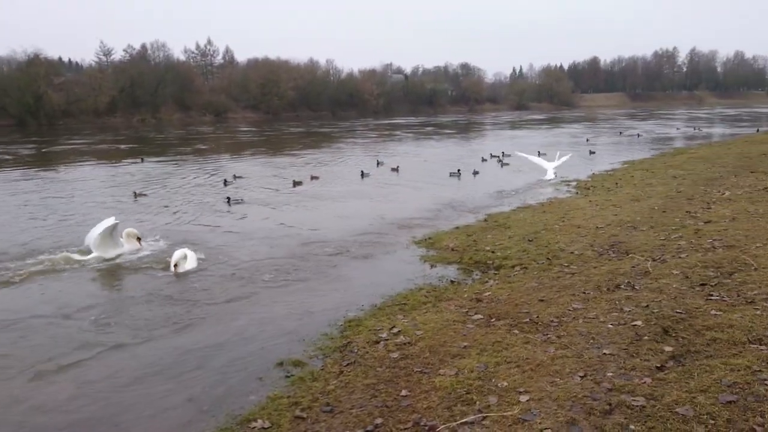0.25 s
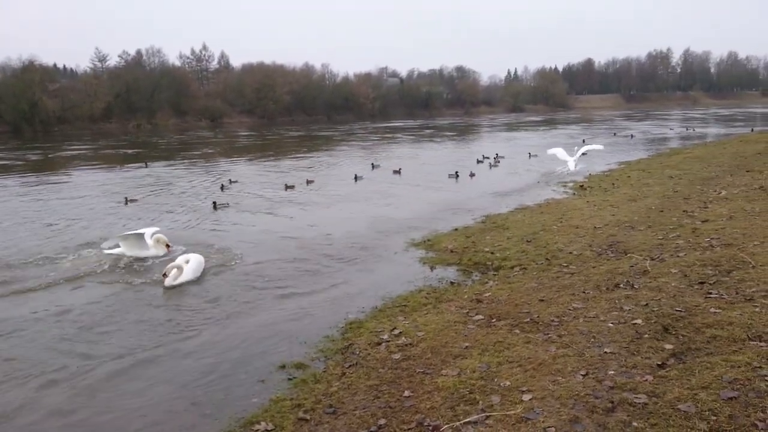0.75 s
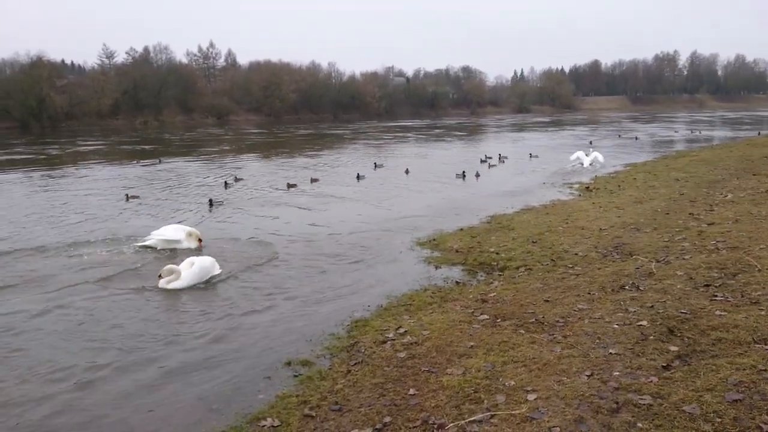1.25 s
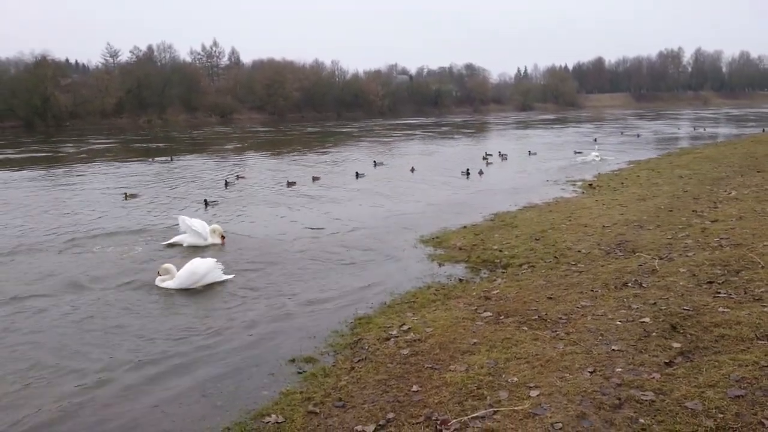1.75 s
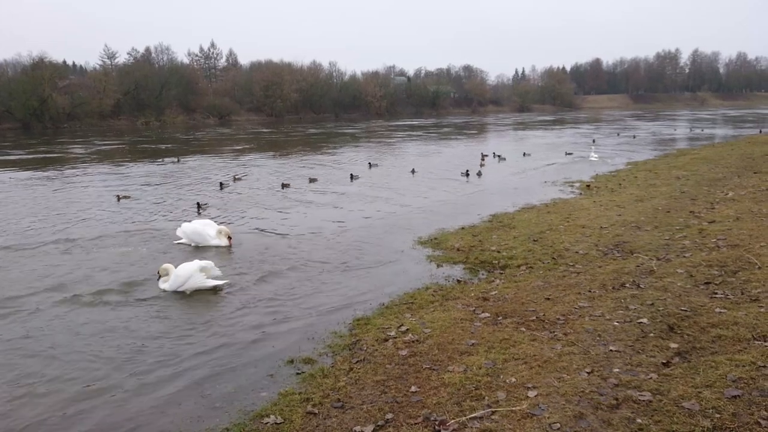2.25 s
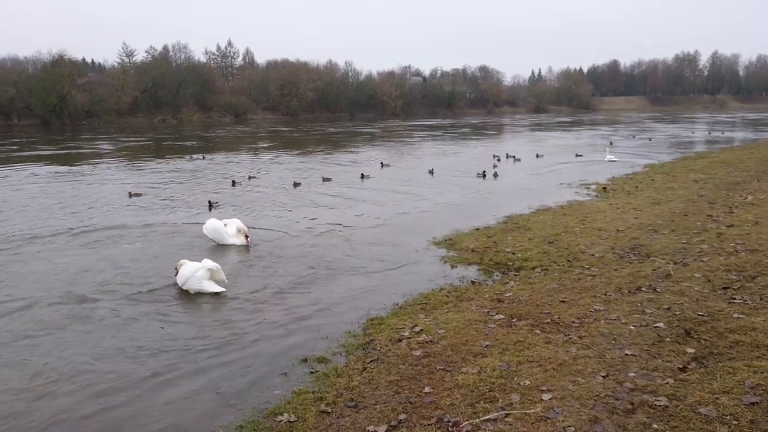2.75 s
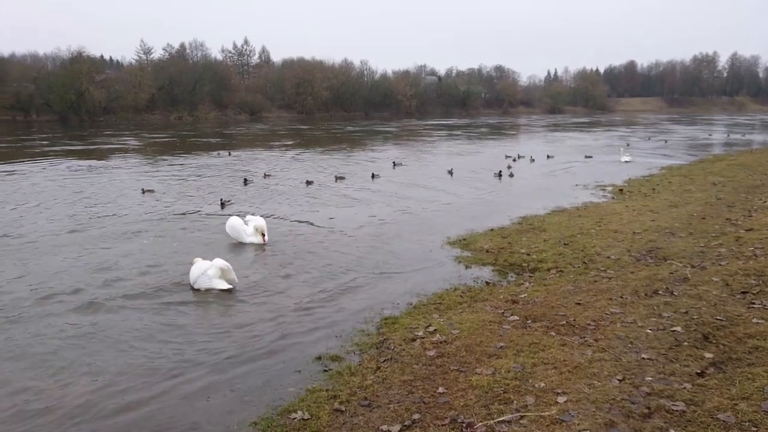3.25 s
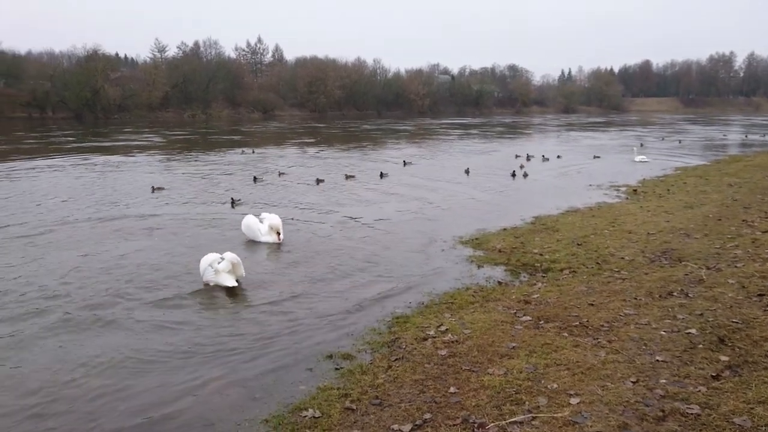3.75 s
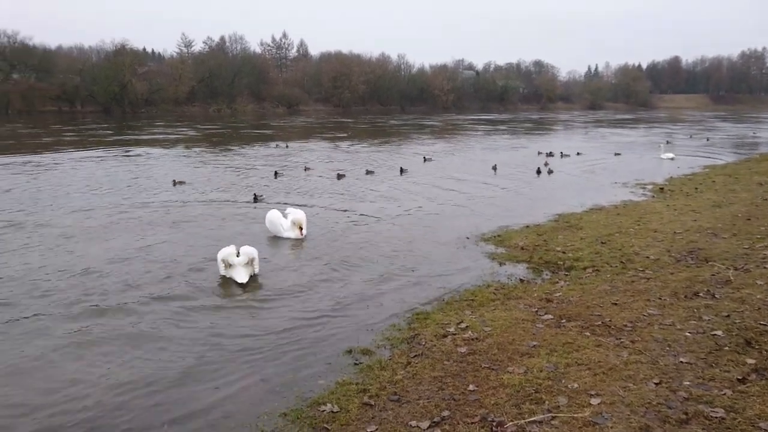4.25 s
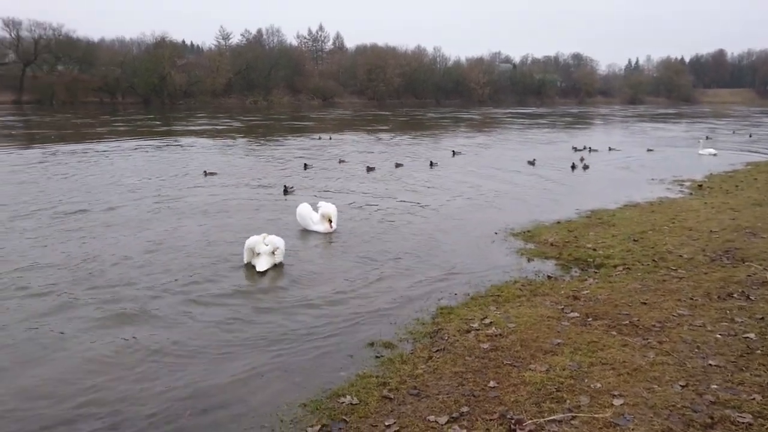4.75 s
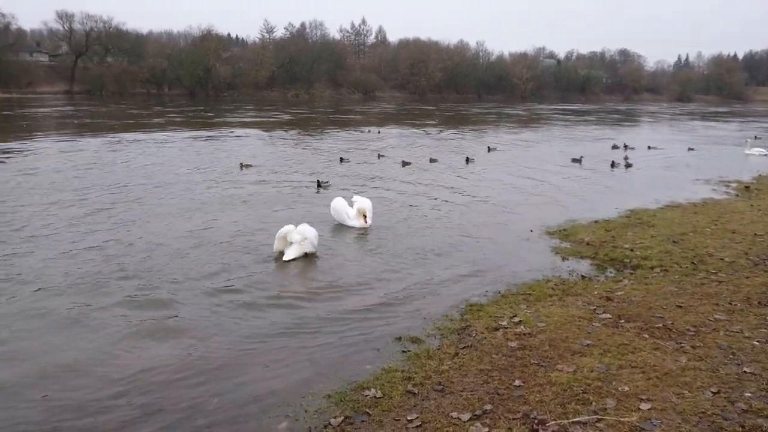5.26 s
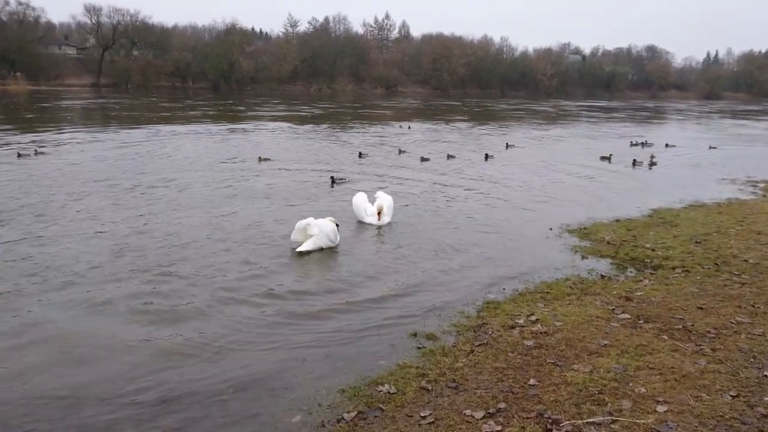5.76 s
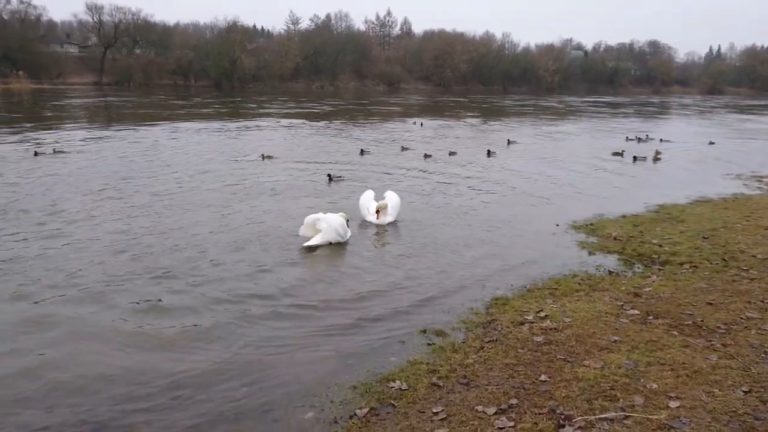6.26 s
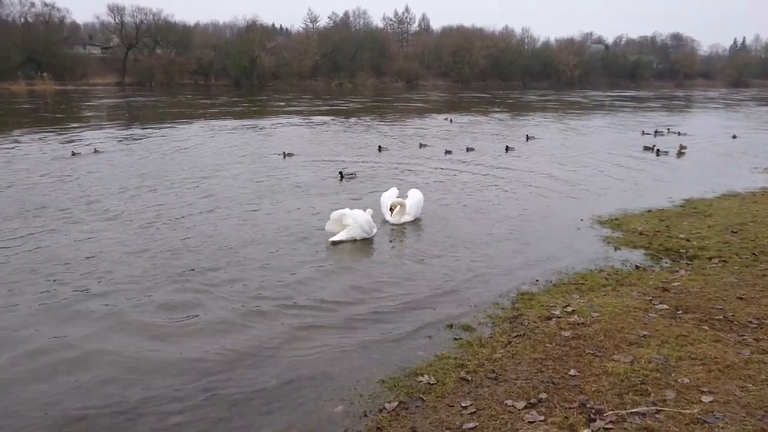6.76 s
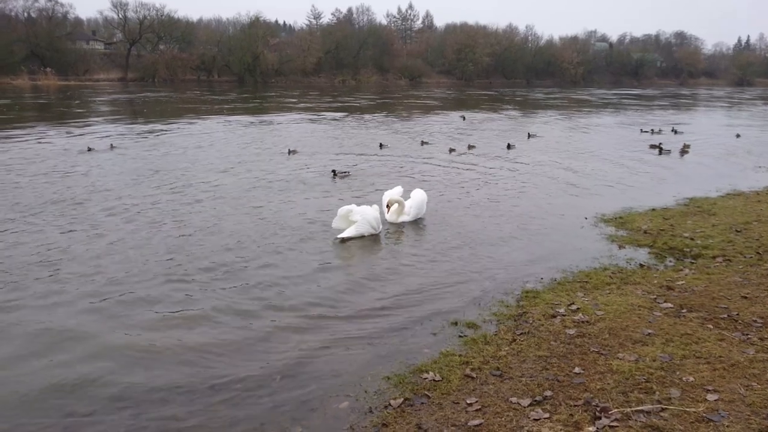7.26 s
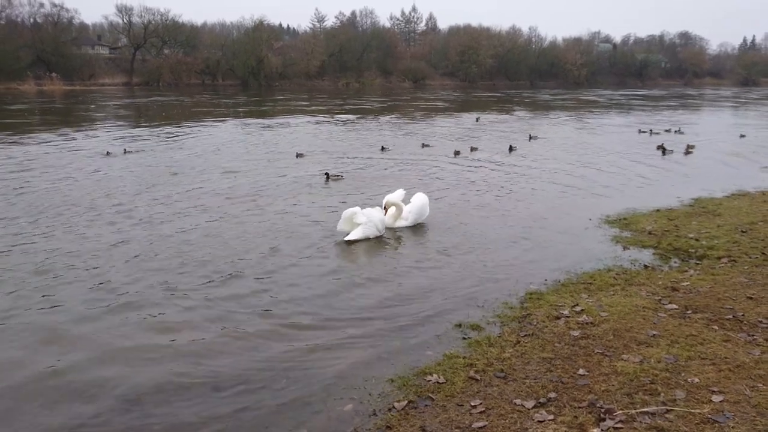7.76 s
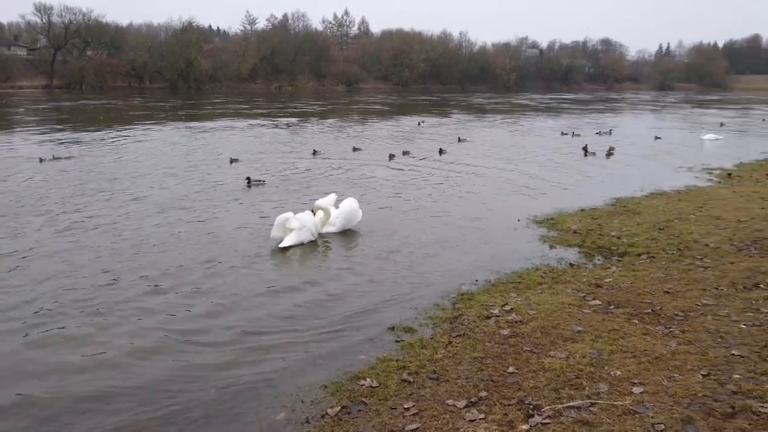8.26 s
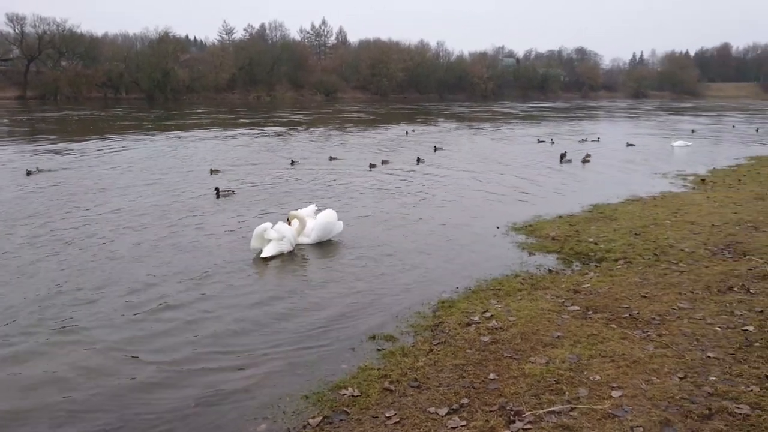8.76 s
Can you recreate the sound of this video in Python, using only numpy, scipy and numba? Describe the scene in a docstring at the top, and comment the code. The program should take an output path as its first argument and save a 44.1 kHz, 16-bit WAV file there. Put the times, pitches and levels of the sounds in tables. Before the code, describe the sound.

A river bank outdoors, with soft current wash and low uneven rumble throughout. At 0 s a landing swan throws up loud fizzing spray, with a cluster of deep hollow slaps until 0.5 s; a smaller splash follows near 1 s, and a few plunks at 1.5 and 2 s, thinning to a trickle. Hoarse, nasal, fluttering swan snorts sound at 0-0.3, 0.6-1.0, 1.4-1.8 and, brighter, 2.1-2.5 s. From 3.2 s small distant ducks quack faintly in short rough notes, more often from 5.7 to 8 s. Strong short snorts come at 4.5-4.85 and 5.4-5.65 s, dropping in pitch at the end. Tiny water ticks appear now and then. A faint far engine hums from about 5.7 s, its pitch climbing. Loud raspy snorts return at 8.25-8.6 s and from 8.95 s to the cut. Swans lean right; thin microphone hiss, little echo.

```python
"""Hoarse swan snorts over a river, with wing slaps and spray from a landing that dies down to a trickle.
Each snort is pulses and air, chopped by a slow flutter, ringing windpipe, throat and beak.
Slaps are ringing air pockets and noise ticks; the spray is coloured drop noise over a gurgle of bubbles.
Behind them ducks quack from pulses through two resonances, a far engine hums as a stack of sines,
and filtered noise gives the low rumble and the wash of the current."""
import sys
import numpy as np
from scipy import signal
from scipy.fft import rfft, irfft, next_fast_len
from scipy.io import wavfile
from scipy.ndimage import uniform_filter1d
from numba import njit

SR = 44100
rng = np.random.default_rng(int(sys.argv[2]) if len(sys.argv) > 2 else 0)


def digitize_waveform(pressure):
    """Quantize a signal to 16-bit integers and store it at the path in sys.argv[1].

    Rows of a 2-D input are taken as channels; values are limited to [-1, 1].
    """
    field = np.atleast_2d(pressure).T
    bounded = np.clip(field, -1, 1)
    quanta = np.round(bounded * 32767).astype(np.int16)
    wavfile.write(sys.argv[1], SR, quanta)


N = 397341
TIME = np.arange(N) / SR

# Wash of the current. Each row: frequency in Hz, relative level in dB.
RIVER_COLOUR = [(150, -5), (220, -8), (360, -17.5), (650, -16.5), (1000, -19.5), (1600, -22.5),
                (2200, -26.5), (3000, -36.5), (4000, -38.5), (5100, -34), (6500, -44), (8500, -45.5),
                (12000, -56.5)]
RIVER_DB = -53.5  # wash level before the stereo spread
# Stereo balance of the river. Each row: frequency in Hz, left minus right in dB.
RIVER_PAN = [(60, -5), (150, -1), (330, -9.5), (700, -5), (1300, 2), (2400, -10), (3900, -15.5),
             (5000, 8.5), (6500, -3), (8000, -5), (10500, 5)]
# Low rumble. Each row: frequency in Hz, relative level in dB.
RUMBLE_COLOUR = [(30, -20), (45, -2), (65, -0.5), (95, -2.5), (140, -8.5), (200, -22.5), (500, -49.5),
                 (1500, -85)]
# Brief swells of the rumble. Each row: middle in seconds, half length in seconds, level in dB before the trim.
RUMBLE_SWELLS = [(0.102, 0.18, -47.5), (0.695, 0.039, -41), (1.825, 0.067, -42.5), (3.068, 0.2, -46),
                 (4.925, 0.023, -41), (5.153, 0.061, -45), (7.03, 0.025, -43.5)]
RUMBLE_DB, RUMBLE_WANDER_DB, RUMBLE_TRIM_DB = -49.5, 1.5, -1  # the floor is set before the trim

# Course of the far engine. Each row: time in seconds, firing rate in Hz, level in dB before its colour.
ENGINE_COURSE = [(5.5, 60.36, -68), (5.9, 61.05, -53.5), (6.2, 63.36, -50), (6.5, 63.64, -55),
                 (7, 72.5, -59), (7.4, 76.7, -73), (8.15, 83.9, -60.5), (8.4, 96.3, -57.5),
                 (8.7, 102.6, -58.5), (9.01, 105.7, -56.5)]
# Tone of the engine. Each row: frequency in Hz, gain in dB.
ENGINE_COLOUR = [(60, 9.5), (105, 8), (130, -24), (200, -2.5), (400, -30), (490, -8.5), (630, -3.5),
                 (760, -26)]

# Duck quacks. Each row: middle in seconds, nominal length in seconds, level in dB before the side gains,
# throat resonance in Hz before the lift of the bill, bill resonance over the throat in dB.
QUACKS = [(3.166, 0.06, -63.5, 1700, -1), (3.317, 0.081, -64.5, 1880, -1), (3.524, 0.041, -69, 1870, 5),
          (3.679, 0.1, -67.5, 1880, 0), (3.87, 0.031, -69.5, 1460, -3), (4.201, 0.05, -67, 1900, 4),
          (4.408, 0.06, -64.5, 1900, -2), (4.95, 0.063, -62, 1830, -2), (5.752, 0.063, -62, 1890, -1),
          (5.923, 0.065, -58.5, 1900, 0), (6.052, 0.019, -69, 1400, -8), (6.19, 0.054, -64, 1920, -16),
          (6.226, 0.066, -62, 1800, 4), (6.351, 0.067, -69.5, 1950, 1), (6.621, 0.072, -63, 1990, 0),
          (6.766, 0.042, -66, 1750, -14), (6.839, 0.06, -59, 1800, -1), (6.981, 0.06, -63, 1970, -4),
          (7.168, 0.073, -61, 1840, 1), (7.338, 0.071, -60.5, 1800, -1.5), (7.64, 0.061, -64, 2040, 2),
          (7.853, 0.088, -62.5, 1903, 1), (8.096, 0.046, -65.5, 1930, -12), (8.707, 0.085, -64.5, 1881, 3),
          (8.79, 0.054, -65, 1850, 0)]
DUCK_THROAT_WIDTH_HZ, BILL_HZ, BILL_WIDTH_HZ = 420, 2646, 295  # the bill's centre is before its lift

# Sheets of water thrown up by the landing swan. Each row: start in seconds, spray in dB before the trim,
# sloshing in dB; both levels are before the rise and fall.
SPLASHES = [(-0.05, -39.5, -54), (0.44, -73, -73), (0.98, -48.5, -53), (1.62, -59, -74)]
SPLASH_RISE_S, SPLASH_FALL_DB_PER_S = 0.13, 23
# The wake under the splashes: starting spray level before the trim, starting slosh level, and fade.
TRICKLE_DB, TRICKLE_SLOSH_DB, TRICKLE_FALL_DB_PER_S = -46, -52, 8
SPRAY_TRIM_DB = 5
# Fizz of the drops. Each row: frequency in Hz, relative level in dB.
SPRAY_COLOUR = [(590, -14.5), (1000, -13.5), (1100, -27), (1390, -4.5), (1600, -12), (1860, -5),
                (2110, -8.5), (2590, -8), (4150, -16), (5040, -9.5), (7790, -26), (11900, -26.5),
                (13500, -24), (15500, -31.5)]
# Stereo balance of the fizz. Each row: frequency in Hz, left minus right in dB.
SPRAY_PAN = [(1200, 1), (2500, -10.5), (3300, -6.5), (4000, -6), (4900, 16.5), (6500, 0), (8500, 0),
             (11000, -2.5), (15000, 32)]

# Air pockets from wings and feet. Each row: start in seconds, nominal peak in dB before the side gains,
# starting pitch in Hz.
PLUNGES = [(0.032, -29.5, 220), (0.079, -32.5, 156), (0.11, -35, 118), (0.138, -34, 202), (0.199, -33, 141),
           (0.251, -29, 180.5), (0.269, -33.5, 288), (0.29, -28.5, 202), (0.455, -40, 204),
           (0.678, -57, 150), (1.101, -39.5, 266), (1.139, -37.5, 230), (1.166, -44, 295),
           (1.549, -42, 226), (1.986, -38, 327)]
# Small sharp splashes. Each row: start in seconds, level in dB before the trim, left minus right in dB.
SPLISHES = [(0.0518, -43, 8), (0.209, -40, 2), (0.482, -34, 1), (1.919, -44, 0), (1.986, -46, -14),
            (2.7232, -64, 1), (4.018, -56, -13), (4.3236, -58, -12), (6.296, -48.5, 6),
            (8.8636, -46.5, 2.5)]
# Tone of the small splashes. Each row: frequency in Hz, relative level in dB.
SPLISH_COLOUR = [(800, 15), (2400, -42), (3600, 25), (5000, 24), (7000, 11), (14000, -28)]

# Swan snorts. Each row: flutter at the start in Hz, flutter at the end in Hz, rasp resonance in Hz,
# its level over the rest of the rasp in dB, and a course. Each course row: time in seconds, pitch in Hz,
# hoarseness from 0 to 1, flutter depth (limited to 1), throat resonance in Hz, throat level in dB,
# neck modes over the throat in dB, beak opening as tilt of the top neck mode over the lowest in dB,
# rasp over the throat in dB.
SNORTS = [ (80, 100, 5500, -9, [(-.05, 297.4, .5, .4, 1590, -43.5, 3, -4, 1),
          (.1, 286, .6, 0.4, 1600, -48, 2, -7, -10), (.28, 282, .5, .4, 1550, -49.5, 4, -7, -2),
          (.312, 250, .6, .4, 1500, -50, 3, -4, -8)]),
          (98.4, 75, 5000, -3, [(.616, 270, 0.83, .9, 1550, -49, -7, -10, -20),
          (.72, 280.8, 0.75, 0.4, 1600, -48, -0.5, -9, -22), (.82, 300.5, 0.67, .4, 1630, -45, 0, -13, -20),
          (.91, 289.5, 0.64, .3, 1640, -48, 3.5, -19, -25),
          (1.01, 267.4, 0.6, 0.4, 1620, -51.5, 4, -27, -20),
          (1.044, 250.7, .7, .4, 1550, -52, 0, -14, -20)]),
          (99.5, 64, 5070, 6, [(1.39, 291, 0.89, 1, 1580, -52, -0.5, -9, -14),
          (1.48, 292.2, .65, 0.65, 1560, -47, 1, -6, -22), (1.57, 289.4, .65, .6, 1570, -46, 0, -7, -11),
          (1.65, 288.7, .6, 0.56, 1600, -45.5, -1.5, -5, -12),
          (1.74, 284, .55, 0.3, 1540, -44.5, -0.5, -7, -10), (1.79, 251, 0.66, .4, 1500, -51, 2, -6, -17)]),
          (81.9, 74, 5300, -2, [(2.1, 300.4, 0.73, 1.2, 1650, -50, -7, -5, -9),
          (2.145, 312.5, 0.53, 0.8, 1600, -45, -3.5, 4, -17),
          (2.23, 323.5, 0.47, 0.36, 1600, -42, -3.5, 1, -13),
          (2.3, 341.3, 0.39, 0.54, 1700, -40.5, -1, -1, -17),
          (2.37, 329.2, 0.53, 0.5, 1650, -43.5, 0.5, -3, -14.5),
          (2.43, 318, 0.44, 0.3, 1590, -39, -4, 0, -12),
          (2.472, 300, 0.41, .3, 1520, -42.5, -5.5, -6, -4.5),
          (2.503, 247.4, .55, .3, 1400, -48, -6, -7, -7)]),
          (85.4, 35, 5400, -12.5, [(4.48, 301.3, .6, 1, 1200, -50, -8, -6, -9.5),
          (4.54, 310.2, 0.54, 0.3, 1280, -42, -2, 2, -1.5), (4.6, 339, .45, .5, 1610, -39, -1.5, 11, -7.5),
          (4.66, 340, 0.37, 0.4, 1700, -36, -5.5, 5, -15), (4.7, 322, 0.25, 0.4, 1610, -35.5, -5, 3, -16),
          (4.75, 300, 0.2, 0.05, 1528, -43.5, 1.5, 4, -11.5),
          (4.78, 294.7, .4, 0.3, 1500, -41.5, -2, -2, -12), (4.815, 284, 0.04, 0, 1540, -45.5, 3, -2, -10),
          (4.853, 225.5, 0.27, 0, 1750, -43.5, -6, -12, -13)]),
          (59.4, 35, 7060, -3, [(5.392, 298.7, 0.62, 0.7, 1560, -54, 0, -16, -18),
          (5.43, 311.3, 0.4, 0.2, 1600, -48, -3, -20, -25),
          (5.468, 365, 0.3, .3, 1790, -41, -9.5, -21, -29),
          (5.495, 340, .3, 0.67, 1640, -38.5, -15, -29, -27),
          (5.55, 308.6, .42, 0.4, 1580, -45.5, -6, -22, -21),
          (5.6, 283, 0.2, .1, 1670, -47.5, -7.5, -20, -24),
          (5.635, 273.6, 0.07, 0, 1710, -42, -13, -16, -23), (5.665, 217, .25, 0, 1620, -49, -6, -7, -18)]),
          (80.6, 60, 6700, -23, [(8.234, 300.2, 0.75, 1, 1570, -50.5, -7, -2, -6),
          (8.275, 316, .6, 0.77, 1600, -40, -4, -1, -5.5),
          (8.304, 329.4, 0.35, 0.2, 1650, -35.5, -3.5, 4, -8),
          (8.335, 321.5, .52, 0.2, 1640, -38.5, -5, 3, -13),
          (8.37, 313.7, 0.44, 0.2, 1610, -36, -5, -1, -10),
          (8.4, 298.7, 0.04, 0.01, 1530, -38, -5.5, 5, -6.5),
          (8.435, 307.6, 0.53, 0.3, 1600, -38, -4, 7, -9.5),
          (8.52, 298.3, .5, 0.1, 1570, -40.5, -2, 9, -10),
          (8.56, 300, 0.59, 0.38, 1600, -41, -4.5, 0, -9.5),
          (8.588, 254.7, 0.62, .3, 1630, -41, -9, -4, -10)]),
          (68.4, 65, 5300, -24, [(8.938, 294.2, 0.63, 1, 1500, -55, -3, -6, -16),
          (8.97, 305, 0.63, 0.97, 1550, -41.5, -2, -7, -14),
          (9.005, 329.6, 0.47, .4, 1650, -35.5, 0, -2, -15), (9.2, 300, .4, .3, 1600, -40, -4, -3, -12)]), ]
# Upper modes of the long neck. Each row: middle frequency in Hz, width in Hz, level in dB before the beak's tilt.
NECK_MODES = [(2056, 285, 1), (2538, 330, 2), (3020, 275, -0.5)]
NECK_SAG_SHARE, NECK_WAVER_SHARE = 0.027, 0.024  # the modes sink during a snort and waver as the neck moves
# Colour of the rasp on top. Each row: frequency in Hz, relative level in dB.
RASP_COLOUR = [(1500, -26), (2900, -19.5), (3200, -0.5), (3480, 5), (3850, -8.5), (4400, -6), (5000, -14),
               (6500, -20), (9000, -22.5), (11000, -39.5), (15000, -34)]
RELEASE_S, WAVER_SHARE = 0.017, 0.007  # the final fade; unsteadiness of the pitch
FLUTTER_DECAY = 2.9  # how steeply a puff dies within one flap at full flutter depth
THROAT_WIDTH_HZ, LOW_EDGE_HZ = 205, 1190  # the main resonance; the beak radiates little below this edge
BODY_HZ, BODY_WIDTH_HZ = 1450, 1230  # a broad resonance that the throat pulls along
# Stereo balance of the swans. Each row: frequency in Hz, left minus right in dB.
SWAN_PAN = [(800, -3), (1250, -10), (1700, -16), (2500, -23), (3200, -18), (4000, -25), (5000, -3),
            (6500, -5), (9000, -11)]

# Microphone hiss. Each row: frequency in Hz, relative level in dB.
HISS_COLOUR = [(5000, -67), (9000, -7.5), (10600, 12.5), (11700, -23), (13100, 20), (14200, -14),
               (15500, -1)]
TOP_HZ = 15800  # upper cutoff of the microphone


def undb(db):
    """Decibels to amplitude."""
    return 10 ** (np.asarray(db) / 20)


def unit(x):
    """Scale to rms 1."""
    return x / np.sqrt(np.mean(x ** 2) + 1e-18)


def steady(x):
    """Scale to rms 1 over every 25 ms."""
    return x / np.sqrt(np.abs(uniform_filter1d(x ** 2, size=1100)) + 1e-12)


def columns(table, t):
    """The columns of a curve at the times t."""
    s, *values = np.transpose(table)
    return [np.interp(t, s, v) for v in values]


def at_hz(points, hz):
    """A spectrum read on a log-frequency axis."""
    f, db = np.transpose(points)
    return np.interp(np.log(np.maximum(hz, 1)), np.log(f), db)


def colour(x, points, size=4096):
    """Causal filter with the given spectrum, built from its cepstrum."""
    cepstrum = irfft(np.log(undb(at_hz(points, np.fft.rfftfreq(size, 1 / SR)))))
    # fold the cepstrum forward in time for minimum phase
    cepstrum[1:size // 2] *= 2
    cepstrum[size // 2 + 1:] = 0
    impulse = irfft(np.exp(rfft(cepstrum)))
    return signal.oaconvolve(x, impulse)[:len(x)]


def ports(left, right, pan):
    """Two microphone ports, each with its own colour; their mean gain is 1."""
    share = [(hz, 2 / (1 + undb(-db))) for hz, db in pan]
    left_colour = [(hz, 20 * np.log10(gain)) for hz, gain in share]
    right_colour = [(hz, 20 * np.log10(2 - gain)) for hz, gain in share]
    return np.array([colour(left, left_colour), colour(right, right_colour)])


@njit
def svf(x, hz, width):
    """State-variable band-pass with a moving centre."""
    y, band, low = np.empty(len(x)), 0., 0.
    for i in range(len(x)):
        g, k = np.tan(np.pi * hz[i] / SR), width / hz[i]
        v = (band + g * (x[i] - low)) / (1 + g * (g + k))
        band, low, y[i] = 2 * v - band, low + 2 * g * v, k * v
    return y


def ring(x, hz, width):
    """A resonance with steep skirts: two equal band-passes in a row."""
    centre = hz * np.ones(len(x))
    return svf(svf(x, centre, float(width)), centre, float(width))


def noise(count):
    """White noise with rms near 1."""
    return rng.standard_normal(count)


def walk(rate, count):
    """Smooth random motion with a spread near 1, given a new target rate times a second."""
    k = max(int(SR / rate), 1)
    steps = np.repeat(noise(count // k + 1), k)
    return 1.2 * uniform_filter1d(steps, k)[:count]


def pulses(hz):
    """A click at each turn of the phase, shared between two samples; also the phase."""
    phase = np.cumsum(hz / SR) % 1
    turn = np.flatnonzero(np.diff(phase) < 0) + 1
    late = phase[turn] * SR / hz[turn]
    out = np.zeros(len(hz))
    out[turn - 1], out[turn] = late, 1 - late
    return out, phase


def add(out, s, x):
    """Mix x in from time s, trimming what lies outside the scene."""
    start = int(s * SR)
    part = x[..., max(-start, 0):max(N - start, 0)]
    start = max(start, 0)
    out[..., start:start + part.shape[-1]] += part


def smear(x, scatter_s):
    """Rippled water scatters a distant sound over a few milliseconds."""
    t = TIME[:SR // 40]
    tail = unit(noise(len(t)) * np.exp(-t / scatter_s))
    return signal.fftconvolve(x, tail)[:len(x)] / np.sqrt(len(t))


def bubble(hz, cycles, glide):
    """A trapped air pocket rings and rises in pitch as it fades."""
    age = np.arange(int(SR * cycles / hz) + 2) * hz / (SR * cycles)  # 0 to 1 over its life
    tone = np.sin(2 * np.pi * cycles * age * (1 + glide * age / 2))
    return tone * 0.0011 ** age * (1 - np.exp(-2 * cycles * age))


def river(flicker_db=1.04, side_db=-1):
    """Noise for rumble and current; the stereo image is narrowest near 150 Hz and widest in the treble."""
    swells = sum(undb(db) ** 2 * np.exp(-((TIME - s) / half_s) ** 2) for s, half_s, db in RUMBLE_SWELLS)
    floor = undb(RUMBLE_DB + RUMBLE_WANDER_DB * walk(3.1, N))
    strength = np.sqrt(floor ** 2 + swells) * undb(RUMBLE_TRIM_DB)
    crossover = signal.butter(4, 170, "high", fs=SR, output="sos")
    pair = []
    for _ in range(2):
        wash = unit(signal.sosfilt(crossover, colour(noise(N), RIVER_COLOUR)))
        wash = wash * undb(RIVER_DB + flicker_db * walk(14, N))
        rumble = unit(colour(noise(N), RUMBLE_COLOUR))
        pair.append(wash + rumble * strength)
    mid, side = pair
    side = undb(side_db) * colour(side, [(60, -3.0), (150, -13), (500, -3.5), (1500, -1.5), (4000, 4.5)])
    return ports(mid + side, mid - side, RIVER_PAN)


def engine():
    """A far engine drones and speeds up: six orders of its firing rate, each wavering in level."""
    hz, db = columns(ENGINE_COURSE, TIME)
    turn = 2 * np.pi * np.cumsum(hz * (1 + 0.00964 * walk(12, N))) / SR
    drone = np.zeros(N)
    for order in range(1, 7):
        order_db = at_hz(ENGINE_COLOUR, order * hz) + 2 * walk(9, N)
        drone += np.sin(order * turn) * undb(order_db)
    return drone * undb(db)


def ducks(pitch_hz=100, jitter=.2, scatter_db=3, scatter_s=0.0025):
    """Short hoarse quacks: uneven pulses and air ring throat and bill around a nominal pitch."""
    out = np.zeros(N)
    for s, length, db, throat_hz, bill_db in QUACKS:
        count = int(1.6 * length * SR)
        arch = np.hanning(count)
        detune = np.exp(.12 * rng.standard_normal() + jitter * walk(150, count))
        clicks, phase = pulses(pitch_hz * (.8 + 0.24 * arch) * detune)
        reed = unit(clicks * undb(scatter_db * walk(220.0, count)))
        air = unit(noise(count) * np.exp(-phase / 0.5))
        source = smear(reed + air, scatter_s)
        # the resonances lift a little as the bill opens, and waver
        lift = 0.953 + 0.028 * arch + 0.014 * walk(73, count)
        throat = unit(ring(source, throat_hz * lift, DUCK_THROAT_WIDTH_HZ))
        bill = unit(ring(source, BILL_HZ * lift, BILL_WIDTH_HZ))
        voice = throat - undb(bill_db) * bill
        voice = signal.sosfilt(signal.butter(8, 2900, fs=SR, output="sos"), voice)
        add(out, s - count / SR / 2, unit(voice) * arch * undb(db))
    return out * np.array([[2.372], [2.976]])  # left and right gains


def settling(splashes, trickle_db):
    """Falling water: each (s, dB) splash rises fast and dies away, over a slowly fading trickle."""
    power = undb(trickle_db - TRICKLE_FALL_DB_PER_S * TIME) ** 2
    for s, db in splashes:
        age = np.maximum(TIME - s, 0)
        rise = np.minimum(age / SPLASH_RISE_S, 1)
        power = power + (rise * undb(db - SPLASH_FALL_DB_PER_S * age)) ** 2
    return np.sqrt(power)


def spray(drops_per_s=2500, spread_db=4, mist=0.98):
    """Thrown water falls back as fizzing drops over the gurgle of bigger bubbles."""
    fizz = []
    for _ in range(2):
        drop_gain = undb(spread_db * np.minimum(rng.exponential(size=N), 2))
        drops = (rng.random(N) < drops_per_s / SR) * noise(N) * drop_gain
        water = unit(colour(unit(drops) + mist * noise(N), SPRAY_COLOUR))
        fizz.append(water * undb(2.0 * walk(25.02, N)))
    gurgle = np.zeros(N)
    for when, pitch, softness in rng.random(size=(3000, 3)):
        pocket = bubble(490 * 2.2 ** pitch, 7.0, 0.31)
        add(gurgle, when * N / SR, pocket * undb(-11 * softness - 4 * pitch))
    falling = undb(SPRAY_TRIM_DB) * settling([(s, db) for s, db, _ in SPLASHES], TRICKLE_DB)
    slosh = unit(gurgle) * settling([(s, db) for s, _, db in SPLASHES], TRICKLE_SLOSH_DB)
    return ports(*fizz, SPRAY_PAN) * falling + slosh * np.array([[.85], [1.15]])


def slaps(cycles=22, splish_trim_db=-8, splish_s=0.0094):
    """Wings and feet push deep air pockets under, which ring; small splashes tick as short noise bursts."""
    out = np.zeros((2, N))
    for s, db, hz in PLUNGES:
        add(out, s, bubble(hz, cycles, 0.374) * undb(db) * np.array([[.8], [1.2]]))
    t = TIME[:SR // 20]
    for s, db, pan_db in SPLISHES:
        tick = unit(colour(noise(len(t)), SPLISH_COLOUR)) * np.exp(-t / splish_s)
        balance_db = np.array([[pan_db], [-pan_db]]) / 2
        add(out, s, tick * undb(db + splish_trim_db + balance_db))
    return out


def windpipe(x, spacing_hz=431, bounce=0.11, scatter=0.45, scatter_s=0.0022):
    """Pulses run up and down the long neck, giving evenly spaced modes; rippled water smears them a little."""
    size = next_fast_len(len(x) + 4096)
    round_trip = np.exp(-2j * np.pi * np.fft.rfftfreq(size, 1 / SR) / spacing_hz)
    scattered = x + scatter * smear(x, scatter_s)
    return irfft(rfft(scattered, size) / (1 - bounce * round_trip))[:len(x)]


def snort(row, jitter=.075, scatter_db=2, air=0.99, gate=.7, rasp_width_hz=1400):
    """Membrane pulses and air, chopped by a slower flutter, ring the windpipe and leave through the beak."""
    flutter_from, flutter_to, rasp_hz, rasp_ring_db, course = row
    start_s, length = course[0][0], course[-1][0] - course[0][0]
    count = int(length * SR)
    age = np.arange(count) / SR
    held_hz, rough, depth, throat_hz, level_db, neck_db, tilt_db, rasp_db = columns(course, start_s + age)
    rough, depth = np.clip(rough, 0, 1), np.clip(depth, 0, 1)

    # hoarseness shakes the pitch and pulse strength and trades reed for air
    pitch_hz = held_hz * (1 + WAVER_SHARE * walk(60, count) + jitter * rough * walk(300, count))
    clicks, phase = pulses(pitch_hz)
    reed = unit(clicks * undb(scatter_db * rough * walk(300, count)))
    rush = unit(noise(count) * np.exp(-phase / gate))
    # each flap lets out a puff that starts sharply and dies away
    flutter_hz = np.linspace(flutter_from, flutter_to, count) * (1 + 0.04 * walk(70, count))
    flap = np.cumsum(flutter_hz / SR) % 1
    puffs = np.exp(-FLUTTER_DECAY * depth ** 2 * flap)
    source = windpipe(((1 - rough) * reed + air * (rough + 0.04) * rush) * puffs)
    source = signal.sosfilt(signal.butter(4, LOW_EDGE_HZ, "high", fs=SR, output="sos"), source)

    throat = svf(source, throat_hz, float(THROAT_WIDTH_HZ))
    throat = steady(ring(throat, (throat_hz + BODY_HZ) / 2, BODY_WIDTH_HZ))
    # the neck's modes alternate in sign; a closing beak tilts them towards the lowest
    sag = 1 + NECK_SAG_SHARE * (.5 - age / length) + NECK_WAVER_SHARE * walk(43.9, count)
    lowest_hz, highest_hz = NECK_MODES[0][0], NECK_MODES[-1][0]
    neck = np.zeros(count)
    for i, (hz, width, db) in enumerate(NECK_MODES):
        mode_db = db + tilt_db * (hz - lowest_hz) / (highest_hz - lowest_hz)
        neck += (-1) ** i * undb(mode_db) * ring(source, hz * sag, width)
    neck = steady(neck)
    jet = source + 0.2 * rush * puffs
    rasp_ring = steady(ring(jet, rasp_hz, rasp_width_hz))
    rasp = steady(steady(colour(jet, RASP_COLOUR)) + undb(rasp_ring_db) * rasp_ring)
    envelope = undb(level_db) * np.clip((length - age) / RELEASE_S, 0, 1)
    return envelope * (undb(neck_db) * neck - throat + undb(rasp_db) * rasp)


def swans(echo_db=-30, echo_s=0.051):
    """All snorts, with a faint scatter from water and bank as a decaying noise tail on each side."""
    dry = np.zeros(N)
    for row in SNORTS:
        course = row[-1]
        add(dry, course[0][0], snort(row))
    t = TIME[:SR // 2]
    tails = [unit(noise(len(t)) * np.exp(-t / echo_s)) / np.sqrt(len(t)) for _ in range(2)]
    wet = np.array([signal.fftconvolve(dry, tail)[:N] for tail in tails])
    return ports(dry, dry, SWAN_PAN) + undb(echo_db) * wet


def scene():
    """The river bank, from the background to the swans."""
    return river() + engine() + ducks() + spray() + slaps() + swans()


def record(dry, hiss_db=-67, whine_db=-77):
    """The microphone adds a thin hiss and whine, mostly on the right, and cuts both ends of the range."""
    hiss = undb(hiss_db) * unit(colour(noise(N), HISS_COLOUR))
    whine = undb(whine_db) * unit(ring(noise(N), 15512, 30))
    noisy = dry + (hiss + whine) * np.array([[.2], [1]])
    wet = signal.sosfilt(signal.butter(8, 39, "high", fs=SR, output="sos"), noisy)
    return signal.sosfilt(signal.ellip(10, .2, 70, TOP_HZ, fs=SR, output="sos"), wet)


dry = scene()
out = record(dry)
digitize_waveform(out)
```